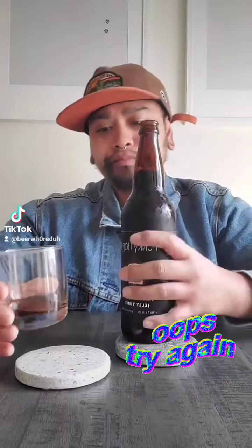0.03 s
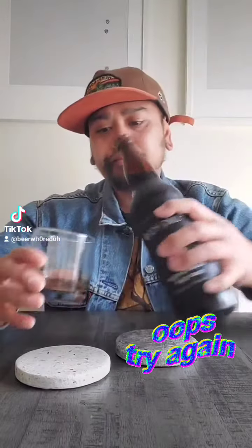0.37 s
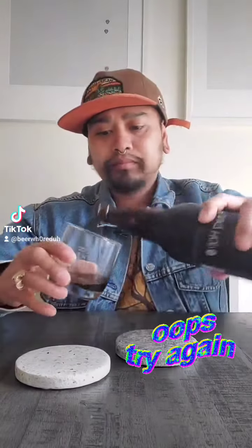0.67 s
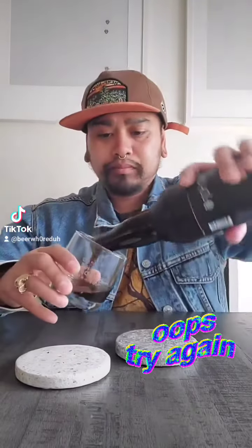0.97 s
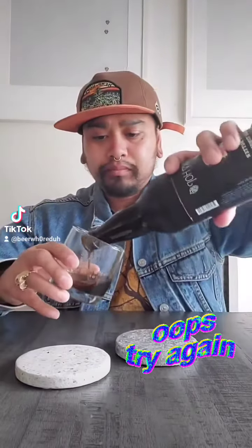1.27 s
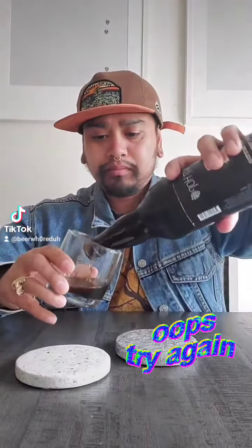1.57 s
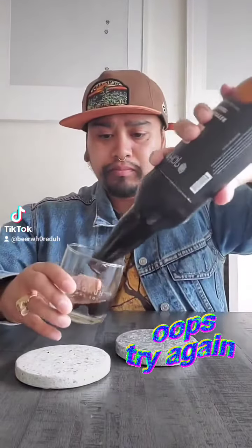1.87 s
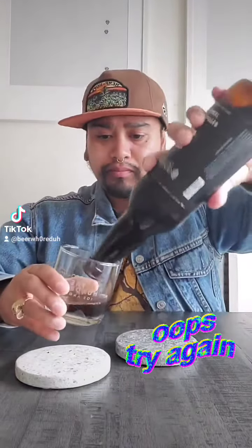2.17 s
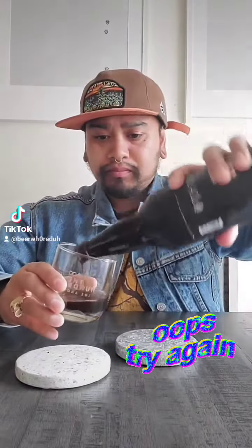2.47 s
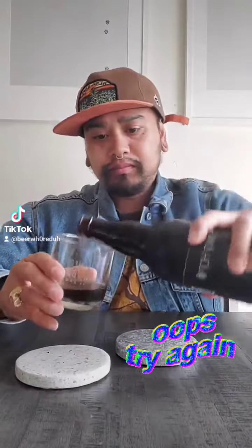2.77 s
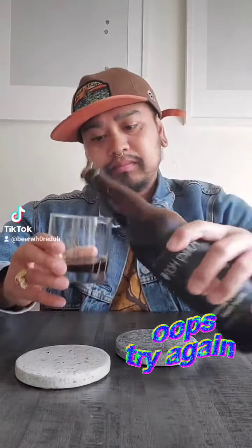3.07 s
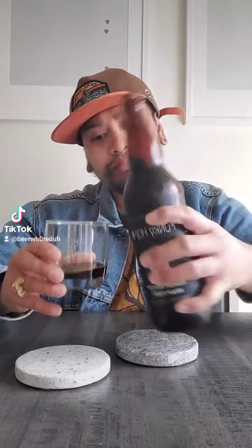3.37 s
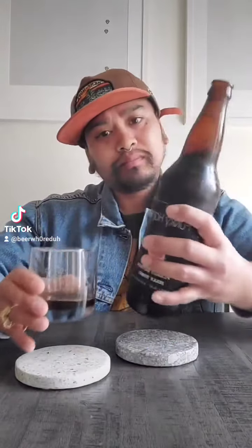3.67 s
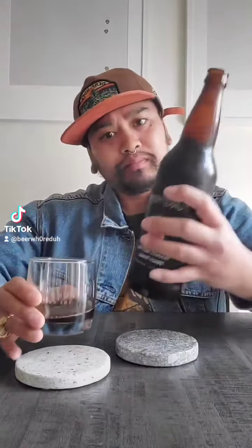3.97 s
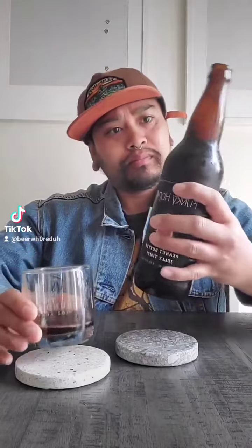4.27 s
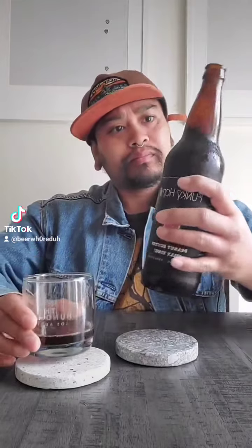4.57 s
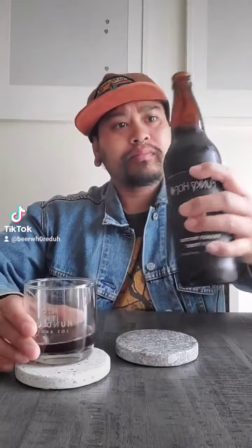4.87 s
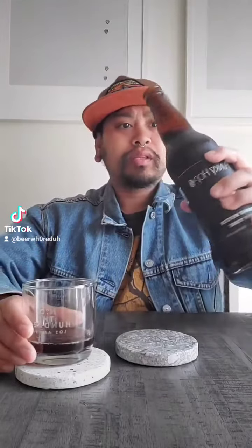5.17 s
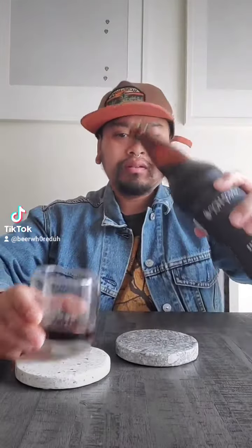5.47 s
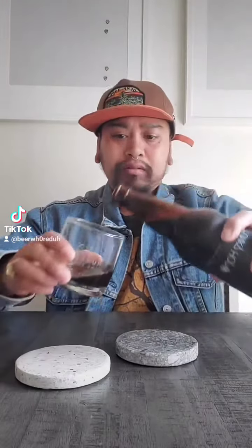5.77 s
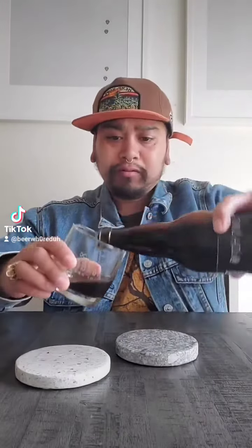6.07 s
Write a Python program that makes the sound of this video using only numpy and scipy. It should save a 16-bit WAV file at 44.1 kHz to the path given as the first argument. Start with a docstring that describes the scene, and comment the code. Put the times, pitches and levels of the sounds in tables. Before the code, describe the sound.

Soft, dull knocks and small ticks of a handled bottle and drinking glass open over a faint hiss that fades away. From about 1.1 to 1.5 seconds beer fizzes quietly, mixed with a few more knocks. At 1.6 seconds the bottle neck chatters brightly on the rim, then skids along it in short scrapes until about 2 seconds. A hollow knock comes at 2.4, a sharp clink at 2.5 and a quick, bouncing rattle of clinks at 2.8 seconds. A lull follows with only faint room noise. At 4.9 seconds the glass is set on a stone coaster with a ringing clack and a low table thump, the loudest moment. Faint ticks and a soft bump follow around 5.5 seconds. From 6.1 to 6.3 seconds the bottle chatters lightly on the rim again. Everything sounds close, with the short echo of a small room.

```python
"""Dull knocks and small ticks of handled glass open over a fading hiss in a small room. Beer fizzes briefly,
and a tipped bottle's neck clinks, chatters and skids on the rim of a drinking glass. The glass is set
on a stone coaster, which thumps the table, and is lifted to the bottle again. Each impact excites damped
modes of the glass and the air in it, with a burst of contact noise; wall echoes prolong the sound."""
import sys
import numpy as np
from scipy import signal
from scipy.fft import rfft, irfft, next_fast_len
from scipy.io import wavfile
from scipy.ndimage import uniform_filter1d, minimum_filter1d

SR = 44100
rng = np.random.default_rng(int(sys.argv[2]) if len(sys.argv) > 2 else 0)


def digitize_waveform(pressure):
    """Quantize a signal to 16-bit integers and store it at the path in sys.argv[1].

    Rows of a 2-D input are taken as channels; values are limited to [-1, 1].
    """
    field = np.atleast_2d(pressure).T
    bounded = np.clip(field, -1, 1)
    quanta = np.round(bounded * 32767).astype(np.int16)
    wavfile.write(sys.argv[1], SR, quanta)


N = 278535
T = np.arange(int(.7 * SR)) / SR  # time axis of one event, in seconds

# spectrum of the contact noise: frequency_hz, level_db
CRACK_SPECTRUM = [(100, -33), (260, -11.5), (600, -10.5), (1000, 15), (1600, -2.5), (2600, 1.5),
                  (3600, 4.5), (4500, -7), (6300, -7), (7600, -15), (10000, -30), (15000, -31)]
# hollow resonances of the air in the glass: pitch_hz, level_db, free_t60_s
AIR_MODES = [(787, -25.5, 0.073), (958, -6, 0.058), (1020.3, -1.5, 0.052), (1127, -12.5, 0.077),
             (2980, -31, 0.043)]


def undb(db):
    """Amplitude grows tenfold for every 20 dB."""
    return 10 ** (np.asarray(db) / 20)


def fade(t60):
    """Exponential decay: 60 dB are lost in t60 seconds."""
    return np.exp(-np.log(1000) * T / t60)


def swell(rise_s):
    """Finite rise time: the excitation builds smoothly."""
    return np.sin(np.pi / 2 * np.minimum(T / max(rise_s, 1 / SR), 1)) ** 2


def choke(free_s, choke_s=.003, left=0.25):
    """Contact damping: the next touch, after free_s, removes most of a vibration."""
    return left + (1 - left) * np.exp(-np.maximum(T - free_s, 0) / choke_s)


def waver(step_s):
    """Random modulation: Gaussian values joined by straight lines."""
    steps = np.arange(N / SR / step_s + 1) * step_s
    return np.interp(np.arange(N) / SR, steps, rng.standard_normal(len(steps)))


def add(out, start_s, sound):
    """Superposition: a sound adds to the others from start_s on."""
    i = max(int(start_s * SR), 0)
    out[i:i + len(sound)] += sound[:N - i]


def highpass(x, hz):
    """Radiation efficiency: small objects give off little bass."""
    return signal.sosfilt(signal.butter(2, hz, "high", fs=SR, output="sos"), x)


def noise(spectrum, size=len(T)):
    """Spectral shaping: noise of unit power follows (frequency_hz, level_db) points."""
    hz, db = np.transpose(spectrum)
    count = next_fast_len(size)
    f = np.maximum(np.fft.rfftfreq(count, 1 / SR), 1)
    gain = undb(np.interp(np.log(f), np.log(hz), db))
    shaped = irfft(rfft(rng.standard_normal(count)) * gain, count)[:size]
    return shaped / shaped.std()


def puff(hz, t60, skirt_db):
    """Band-limited transient: dying noise around one pitch, skirt_db down an octave away."""
    burst = noise([(hz * 2. ** k, -skirt_db * abs(k)) for k in range(-3, 4)]) * fade(t60)
    return burst * np.linalg.norm(fade(t60)) / np.linalg.norm(burst)


def ring(modes, gains_db=0, detune=0.001):
    """Free vibration: a sum of damped sines, a little different at each blow."""
    hz, db, t60 = np.transpose(modes)
    louder, sharper = rng.standard_normal((len(hz), 2)).T
    gain = undb(db + gains_db + louder)
    hz = hz * (1 + detune * sharper)
    return sum(g * np.sin(2 * np.pi * f * T) * fade(d) for f, g, d in zip(hz, gain, t60))


def background(air_db=-64, hiss_db=-51.5, hiss_fall_db_per_s=25, rumble_db=-39):
    """Ambient noise: room air wavers quietly; a hiss and a table rumble decay at the start."""
    # spectrum of the room air: frequency_hz, level_db
    air_spectrum = [(15, -34), (25, -9), (54, -6.5), (167, -6), (186, -8), (219, 4.5), (243, -4.5),
                    (363, -5), (673, -11.5), (978, -18), (1460, -27.5), (2180, -32), (4500, -30.5),
                    (6300, -24), (8800, -35.5), (12600, -32), (15000, -43.5)]
    # spectrum of the hiss: frequency_hz, level_db
    hiss_spectrum = [(300, 11), (1200, 4.5), (2200, -9.5), (3200, -9.5), (4500, -5.5), (5500, -7.5),
                     (7600, -5), (8800, -26.5), (12500, -10.5), (14500, -31)]
    air = noise(air_spectrum, N) * undb(air_db + waver(step_s=0.13))
    hiss = noise(hiss_spectrum, N) * undb(hiss_db - hiss_fall_db_per_s * np.arange(N) / SR)
    out = air + hiss
    add(out, 0, undb(rumble_db) * puff(hz=77, t60=1.0, skirt_db=19.0))
    return out


def handling(hand_t60=0.051):
    """Damped transients: knocks that the hand stops at once, low bumps, a set-down thump and ticks."""
    # dull knocks on the held glass: start_s, air_db, thud_db, crack_db, rise_s
    knocks = [(.006, -27.5, -28.5, -52, 0.0023), (0.55, -88, -53, -82, .001),
              (1.0661, -35.5, -31, -33, 0.0035), (1.2309, -22, -35.5, -39.5, 0.0015),
              (1.2426, -27, -36, -35, 0.00077), (1.301, -40, -48, -35.5, 0.00096),
              (2.228, -57, -47.5, -62, 0.00062), (2.391, -16, -42.5, -57.5, 0.0054),
              (2.553, -36.5, -30, -38.5, .002), (5.039, -18.5, -44, -56, 0.0032),
              (5.5739, -30, -51.5, -72, 0.0027), (6.259, -46, -31, -32.5, 0.0024)]
    # low bumps of handled bottle and glass, and the low thump of the glass being set down:
    # start_s, level_db, pitch_hz, t60_s
    bumps = [(0.015, -28, 280, .09), (.05, -35.5, 200, .11), (0.232, -33, 293, 0.081),
             (0.294, -35.5, 293, 0.12), (.318, -26.5, 320, 0.071), (1.058, -33, 190, .06),
             (1.225, -32, 300.4, .06), (2.554, -33, 286, 0.074), (2.73, -37.5, 260, .06),
             (4.932, -15.5, 180, 0.031), (5.576, -36, 110, .06), (6.251, -38.5, 198, 0.054)]
    # light ticks and pings of glass: start_s, level_db, pitch_hz, t60_s, skirt_db_per_octave
    ticks = [(.003, -44.5, 4860, .2, 181), (.004, -39, 1790, .16, 36), (0.326, -56, 4830, .12, 137),
             (.549, -53, 6700, .018, 35), (1.072, -37.5, 3800, .066, 18.5), (1.217, -41, 1447, .05, 20),
             (1.2326, -32, 2880, .07, 98), (1.2313, -42.5, 4550, 0.064, 97.5),
             (1.449, -49.5, 5170, .05, 23.5), (2.398, -46, 6500, 0.0085, 24.5),
             (2.398, -52.5, 2750, 0.028, 60.5), (2.284, -50, 5800, .05, 21.5),
             (2.752, -31.5, 3970, .035, 14.5), (3.26, -60, 2683, .035, 32.5), (5.41, -46, 11640, .17, 49),
             (5.409, -54, 3250, .14, 13), (5.576, -60, 2110, 0.19, 254)]
    out = np.zeros(N)
    for start_s, air_db, thud_db, crack_db, rise_s in knocks:
        thud = undb(thud_db) * puff(hz=650, t60=0.05, skirt_db=21)
        crack = undb(crack_db) * noise(CRACK_SPECTRUM) * fade(t60=0.013)
        hollow = ring(AIR_MODES, air_db) * fade(hand_t60)
        add(out, start_s, (hollow + thud + crack) * swell(rise_s))
    for start_s, db, hz, t60 in bumps:
        add(out, start_s, undb(db) * puff(hz, t60, skirt_db=20.5) * swell(rise_s=0.062 * t60))
    for start_s, db, hz, t60, skirt_db in ticks:
        add(out, start_s, undb(db) * puff(hz, t60, skirt_db) * swell(rise_s=0.0016))
    return out


def fizz(start_s=1.05, attack_s=.1, hold_s=.21, release_t60=0.38, glug_hz=9.9, glug_db=3):
    """Amplitude modulation: froth and bursting bubbles follow the spurts of beer running into the neck."""
    # spectrum of the froth: frequency_hz, level_db
    froth_spectrum = [(1500, -7), (4000, -3), (7500, 1.5), (9000, -9), (12000, 0), (13500, -10),
                      (14500, -12.5)]
    froth_db, grain_db = -63.5, 3
    bubbles_per_s, bubble_db, scatter_db = 150, -52.5, 4
    bubble_hz, spread_octaves, bubble_t60 = 7200, 0.57, 0.011
    release = undb(-60 * np.maximum(T - attack_s - hold_s, 0) / release_t60)
    spurts = undb(glug_db * np.cos(2 * np.pi * glug_hz * (T - attack_s)))
    flow = swell(attack_s) * release * spurts
    froth = undb(froth_db + grain_db * waver(step_s=0.0014)[:len(T)]) * noise(froth_spectrum)
    bubbles, out = np.zeros(N), np.zeros(N)
    for when, pitch, strength in rng.uniform(-1.2, 1, (int(bubbles_per_s * T[-1]), 3)):
        pop = ring([(bubble_hz * 2 ** (spread_octaves * pitch), bubble_db + scatter_db * strength, bubble_t60)])
        add(bubbles, abs(when) * T[-1], pop)
    add(out, start_s, (froth + bubbles[:len(T)]) * flow)
    return out


def touch(ring_db, low_db, tilt_db, air_db, crack_db, sizzle_db, lean, free_s):
    """Impact excitation: one touch of neck on rim sounds glass modes, air modes and contact noise."""
    # modes of the glass and the bottle neck: pitch_hz, level_db, free_t60_s, lean_rise_hz
    glass_modes = [(2098, 1, .14, 135), (2116, -12, .2, 150), (3277, 2, .1, 25), (3294, -15, .2, 130),
                   (4328, -27, .1, 0), (5457, -3, .11, 100), (8405, -12, .12, 55), (9130, -37, .17, 0),
                   (9819, -42, .25, 0), (10865, -13, .1, 40), (12576, -13, .19, 0), (13264, -18, .14, 0)]
    # spectrum of the high contact noise: frequency_hz, level_db
    sizzle_spectrum = [(4000, -21.5), (7500, -19), (8400, 0), (9200, -21.5), (10200, -24.5), (10900, 1.5),
                       (12000, -2.5), (13200, -10), (14300, -23.5)]
    hz, db, t60, lean_rise_hz = np.transpose(glass_modes)
    # the place of contact sets the share of the lowest pair, its hardness that of the high modes
    gains_db = ring_db + np.where(hz < hz[:3].mean(), low_db, tilt_db * np.log2(hz / hz[2]))
    # a leaning neck stiffens and damps the rim
    pitch = hz + lean * lean_rise_hz
    decay = t60 / (1 + 0.88 * lean)
    glass = ring(np.transpose([pitch, db, decay]), gains_db)
    # a faint share of each mode escapes the fingers and rings longer
    after_ring = ring(np.transpose([pitch, db, decay * 3.2]), gains_db - 35.5)
    tones = highpass((glass + after_ring + ring(AIR_MODES, air_db)) * choke(free_s), hz=520)
    # a harder contact also brightens the crack
    crack_db_per_octave = 0.48 * (tilt_db + 6.5)
    tilted = [(f, level + crack_db_per_octave * np.log2(f / hz[2])) for f, level in CRACK_SPECTRUM]
    crack = undb(crack_db) * noise(tilted) * fade(t60=0.034)
    sizzle = undb(sizzle_db) * noise(sizzle_spectrum) * fade(t60=0.063)
    return highpass((tones + crack + sizzle) * swell(rise_s=.0014), hz=148)


def clinks(hasten=0.56, ring_loss=1.76, crack_loss=0.81, sizzle_loss=2.1):
    """Inelastic rebound: the neck bounces on the rim ever sooner and softer; the sizzle fades fastest."""
    # strikes on the rim: start_s, blow_count, first_gap_s, air_loss_db_per_bounce, ring_db,
    # low_pair_db, tilt_db_per_octave, air_db, crack_db, sizzle_db, lean_fraction
    strikes = [(1.559, 1, 0, 0, -24, 7.5, 2.5, -16.5, -22.5, -26, 0),
               (1.5755, 5, .0085, 2.5, -17.5, 0, -2, -19.5, -17.5, -24.5, .05),
               (2.529, 1, 0, -10, -9.5, -10.5, -4.5, -20.5, -12.5, -30, 0.01),
               (2.7939, 7, .021, 2, -12.5, 3, -7.5, -13, -14.5, -37.5, 0.02),
               (6.1305, 2, .0435, 1.5, -31.5, 10.5, -17, -16, -18, -43.5, 0),
               (6.2005, 4, 0.02, 1.35, -34, 5.5, -10.5, -27.5, -30.5, -51, 0.03)]
    out = np.zeros(N)
    next_strike = [row[0] for row in strikes[1:]] + [N / SR]
    for row, until_s in zip(strikes, next_strike):
        start_s, count, gap_s, loss_db, ring_db, low_db, tilt_db, air_db, crack_db, sizzle_db, lean = row
        for k in range(count):
            free_s = gap_s / (k + 1) ** hasten if k + 1 < count else until_s - start_s
            lost_db = k * loss_db
            clink = touch(ring_db - ring_loss * lost_db, low_db, tilt_db, air_db - lost_db,
                          crack_db - crack_loss * lost_db, sizzle_db - sizzle_loss * lost_db, lean, free_s)
            add(out, start_s, clink)
            start_s += free_s
    return out


def skids():
    """Stick-slip friction: each push of the neck along the rim spreads into many tiny slips."""
    # pushes of the leaning neck: start_s, level_db, slips_t60_s
    pushes = [(1.783, -34.5, 0.1), (1.823, -43, 0.089), (1.881, -41.5, 0.065), (1.918, -40.5, 0.029)]
    out = np.zeros(N)
    for start_s, db, t60 in pushes:
        slip = touch(ring_db=0, low_db=-6, tilt_db=1, air_db=6.5, crack_db=0, sizzle_db=-24,
                     lean=0.99, free_s=.035)
        friction = rng.standard_normal(len(T)) * fade(t60) * swell(rise_s=0.097 * t60)
        add(out, start_s, undb(db) * signal.fftconvolve(slip, friction / np.linalg.norm(friction)))
    return out


def landing(stone_t60=.5, thump_s=4.9285, thump_db=-12):
    """Coupled vibration: the glass rocks onto the stone, which damps it, and the table thumps once."""
    # blows of the thick base on the coaster: start_s, ring_db, clack_db
    blows = [(4.9225, -8.5, -5.5), (4.9255, -20, -10.5), (4.9353, -16, -15.5), (4.952, -22, -22),
             (4.9664, -37, -16)]
    # modes of the base with the coaster: pitch_hz, level_db, free_t60_s
    base_modes = [(1043, -10.5, 0.12), (1164, -5, 0.11), (2116.5, 2, 0.27), (2227, -6.5, 0.047),
                  (2590, -19, .1), (2885, -2, .08), (3290, -4.5, .08), (4214, -3.5, .22), (4340, -6, .19),
                  (4210, -5, .14), (5348, -14, 0.085), (5620, -18, .08), (6040, -10, 0.071),
                  (6300, -10, .08), (6660, -15.5, .09), (9130, -29.5, .2)]
    # contact noise of glass on stone: frequency_hz, level_db
    clack_spectrum = [(150, -9), (450, 7), (720, -10.5), (1050, 15), (1600, -5.5), (2400, 10), (3600, 3.5),
                      (4300, 2), (6500, 4.5), (7500, -25), (9500, -24), (14000, -20)]
    # modes of the table: pitch_hz, level_db, t60_s
    table_modes = [(69, -14, .3), (90, -24, .2), (165, -11, .1), (222, -3, .085), (243, -4, .07),
                   (264, 2, .1), (305, -21, .08)]
    out = np.zeros(N)
    next_blow = [row[0] for row in blows[1:]] + [N / SR]
    for (start_s, ring_db, clack_db), until_s in zip(blows, next_blow):
        tones = highpass(ring(base_modes, ring_db) * choke(until_s - start_s) * fade(stone_t60), hz=400)
        clack = undb(clack_db) * noise(clack_spectrum) * fade(t60=0.03)
        add(out, start_s, (tones + clack) * swell(rise_s=0.0005))
    add(out, thump_s, ring(table_modes, thump_db) * swell(rise_s=0.007))
    return out


def room(direct, gap_s=0.0021, build_s=0.0009):
    """Reverberation: dense wall echoes follow the direct sound and last longest in the bass."""
    # bands of the wall echoes: frequency_hz, level_db, t60_s
    echo_bands = [(80, -6.5, 0.68), (252, 1.5, 0.27), (1000, -8, 0.42), (2570, -8, .38), (6400, -8, .36),
                  (8450, -15, 0.046), (14000, -12.5, 0.27)]
    hz, db, t60 = np.transpose(echo_bands)
    log_f = np.log(np.maximum(np.fft.rfftfreq(len(T), 1 / SR), 1))
    white = rfft(rng.standard_normal(len(T)))
    onset = 1 - np.exp(-np.maximum(T - gap_s, 0) / build_s)
    tail = np.zeros(len(T))
    for share, level_db, decay in zip(np.eye(len(hz)), db, t60):
        envelope = onset * fade(decay)
        band = irfft(white * np.interp(log_f, np.log(hz), share), len(T))
        tail += undb(level_db) * band * envelope / np.linalg.norm(envelope)
    return direct + signal.fftconvolve(direct, tail)[:N]


def scene():
    """Superposition: the contacts and the fizz reverberate in one room, over its ambient noise."""
    return (background() + room(clinks() + skids() + landing() + handling() + fizz()))[None]


def record(dry, ceiling=.85, top_hz=15000):
    """Peak limiting: the level dips briefly at the highest peaks; a low-pass cuts the top treble."""
    allowed_gain = np.minimum(ceiling / (abs(dry) + 1e-9), 1)
    gain = uniform_filter1d(minimum_filter1d(allowed_gain, size=180), size=180)
    return signal.sosfilt(signal.ellip(8, .2, 80, top_hz, fs=SR, output="sos"), dry * gain)


dry = scene()
out = record(dry)
digitize_waveform(out)
```